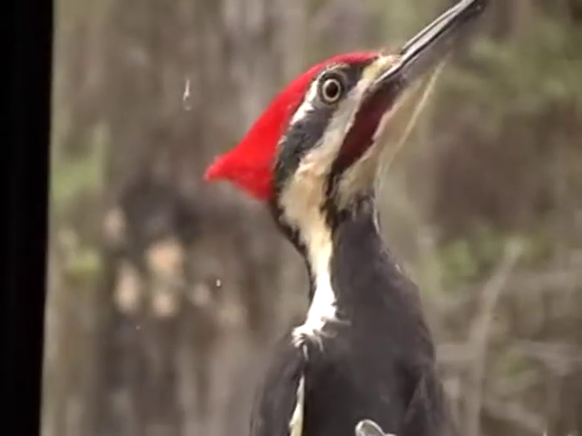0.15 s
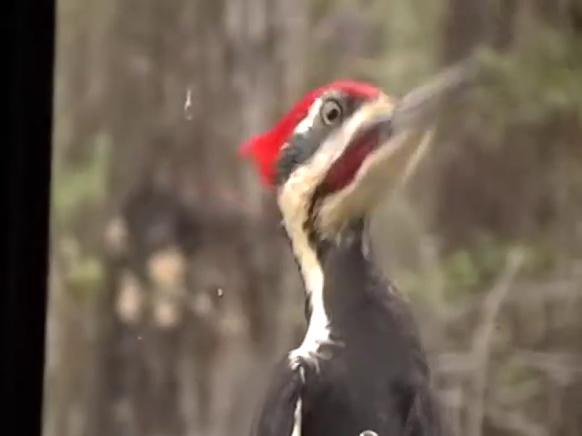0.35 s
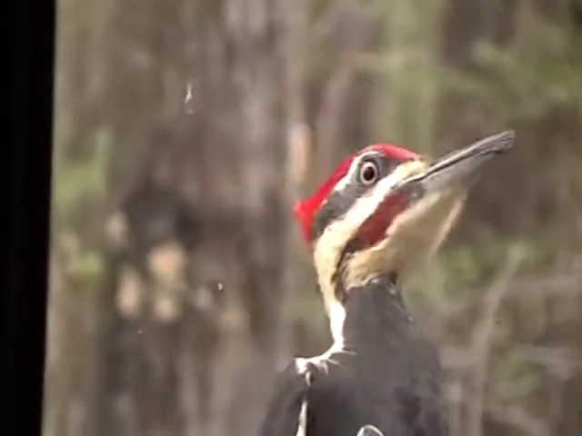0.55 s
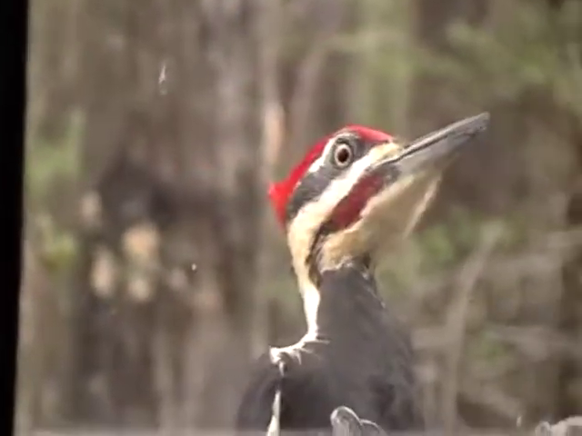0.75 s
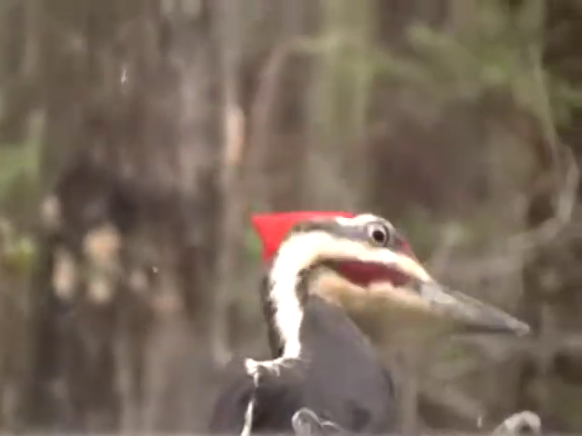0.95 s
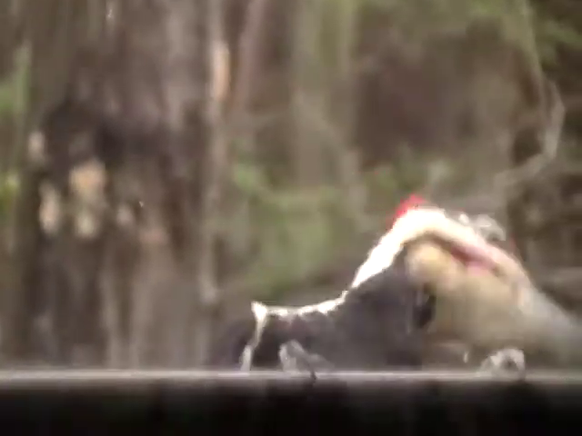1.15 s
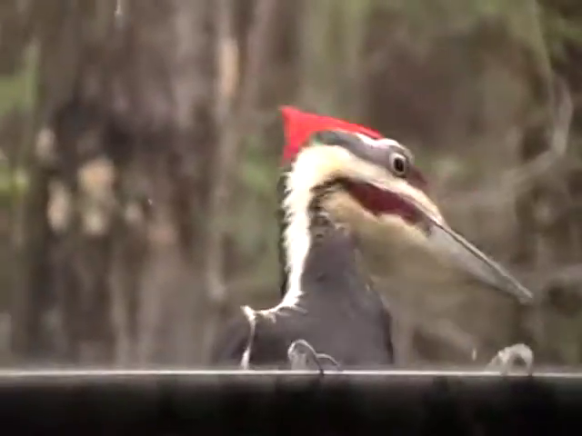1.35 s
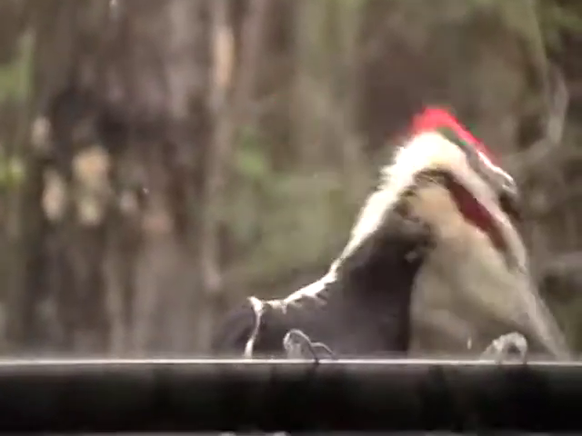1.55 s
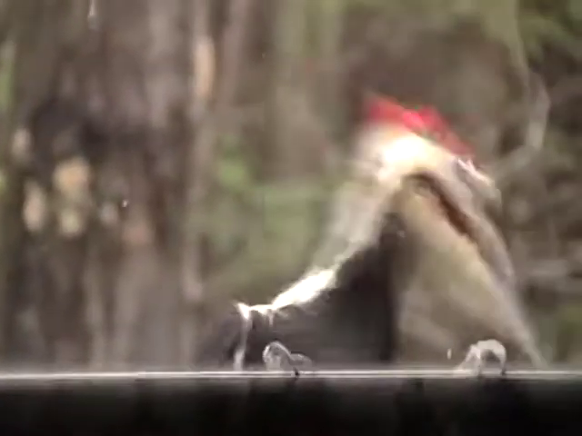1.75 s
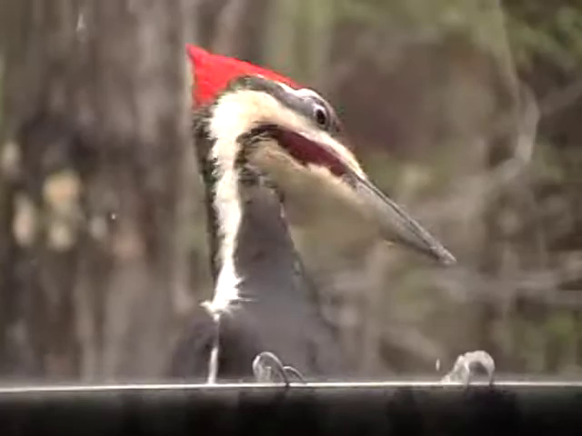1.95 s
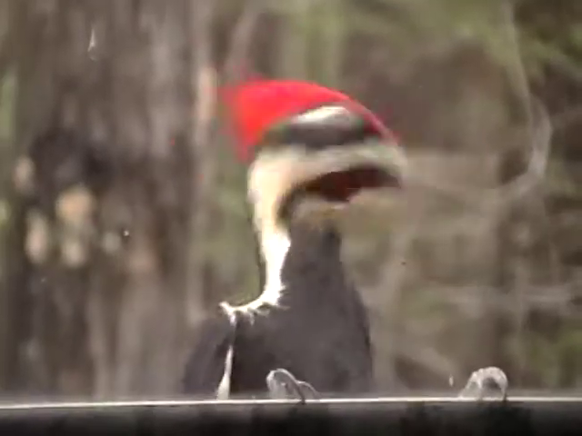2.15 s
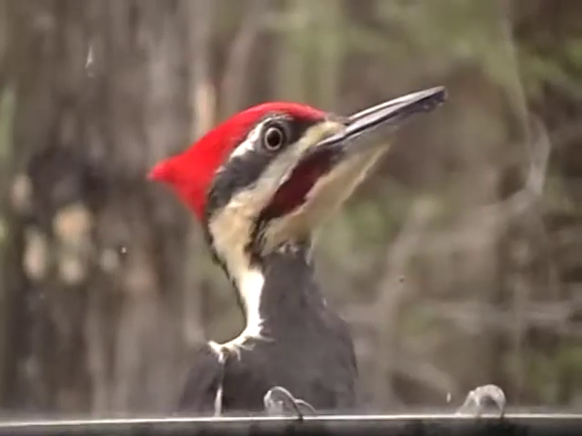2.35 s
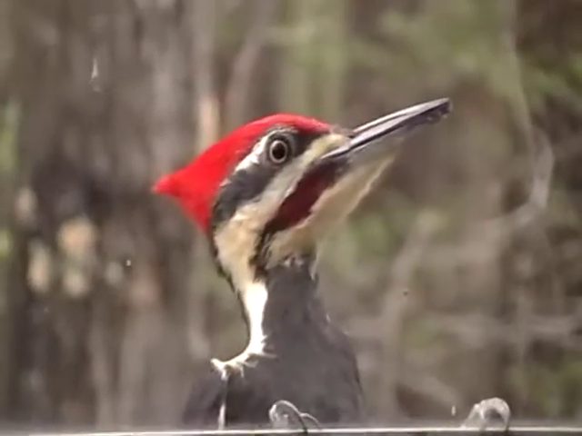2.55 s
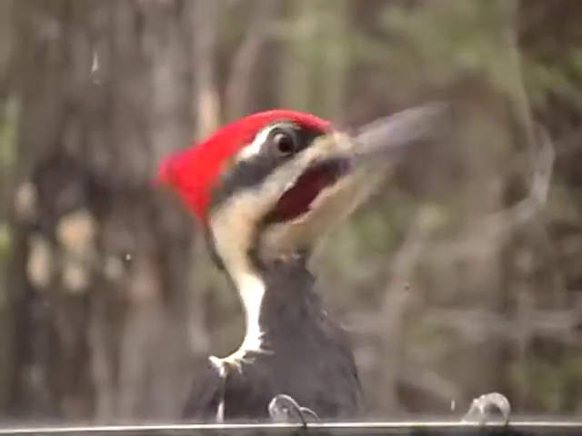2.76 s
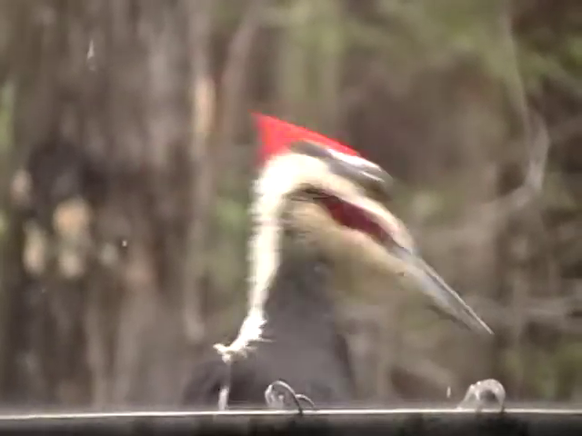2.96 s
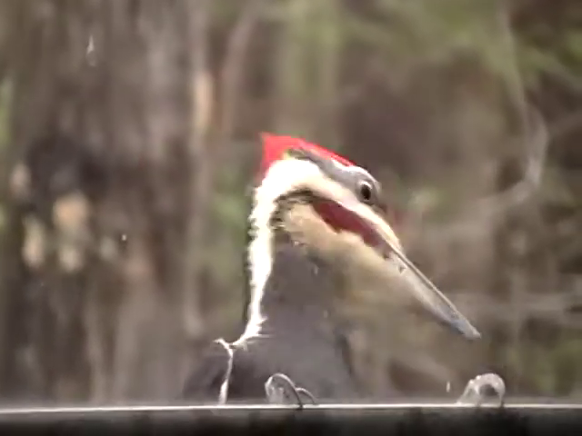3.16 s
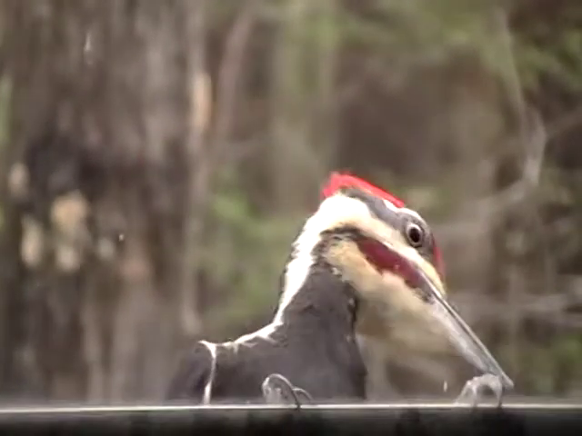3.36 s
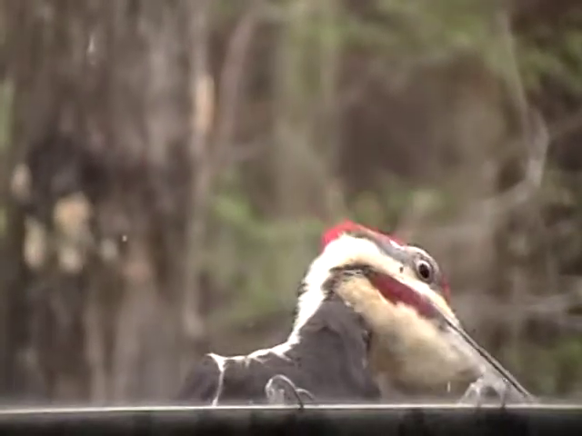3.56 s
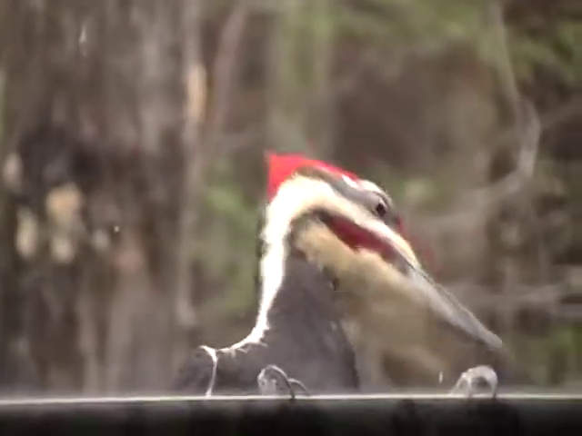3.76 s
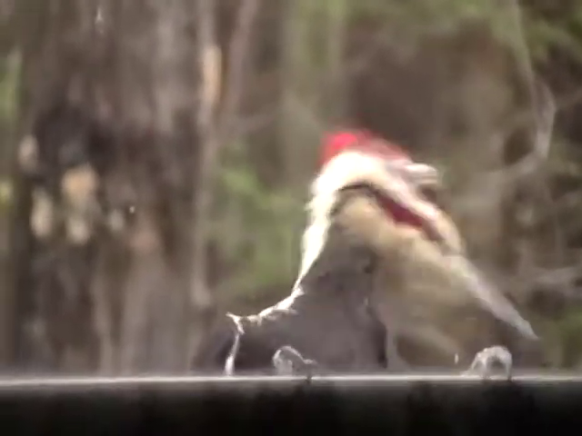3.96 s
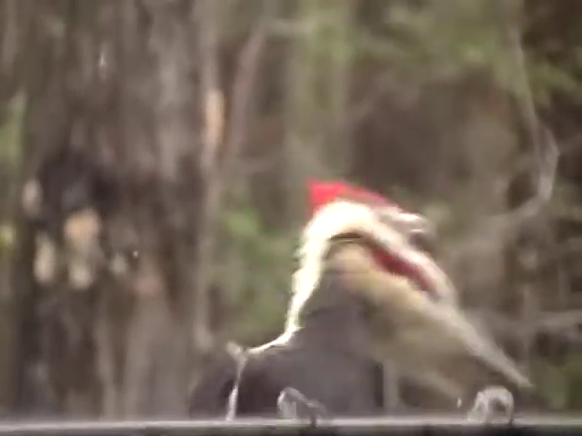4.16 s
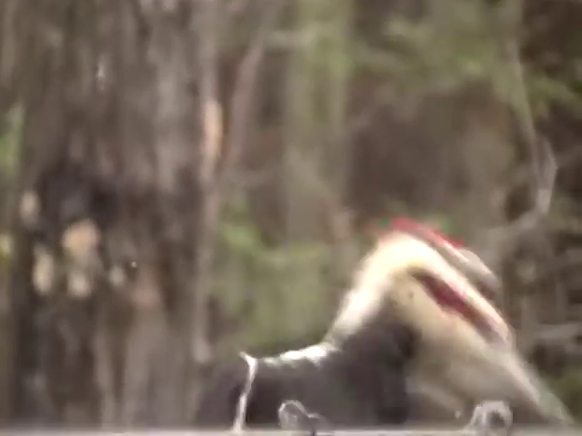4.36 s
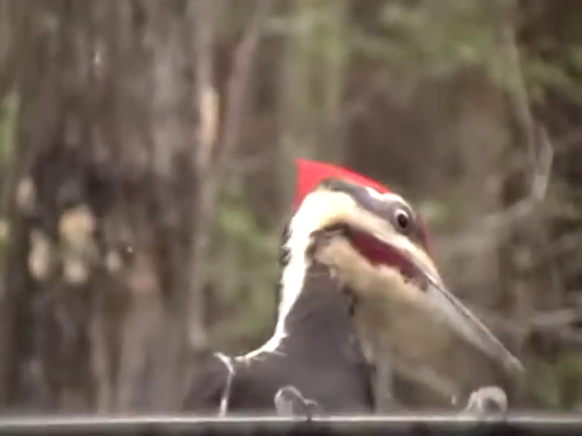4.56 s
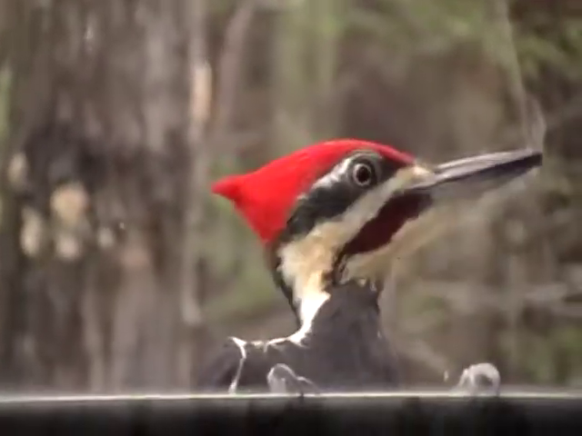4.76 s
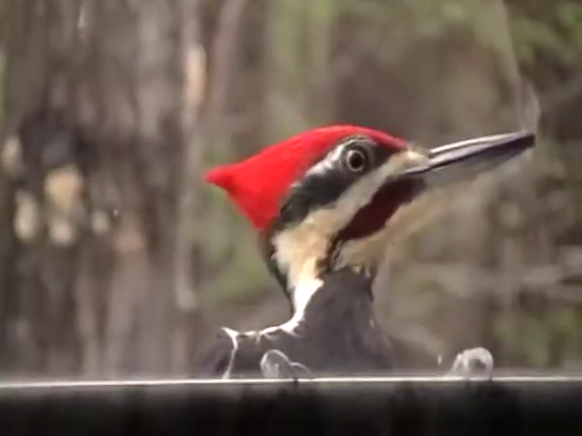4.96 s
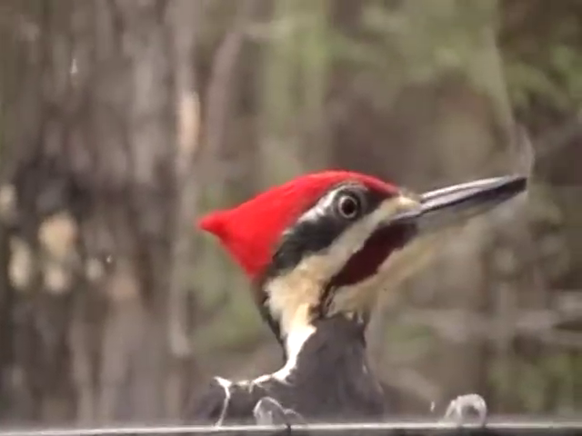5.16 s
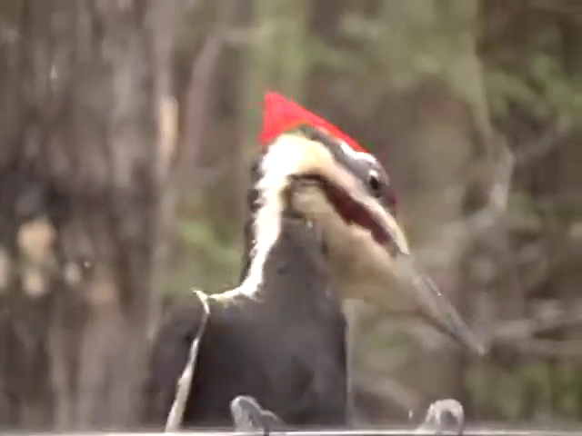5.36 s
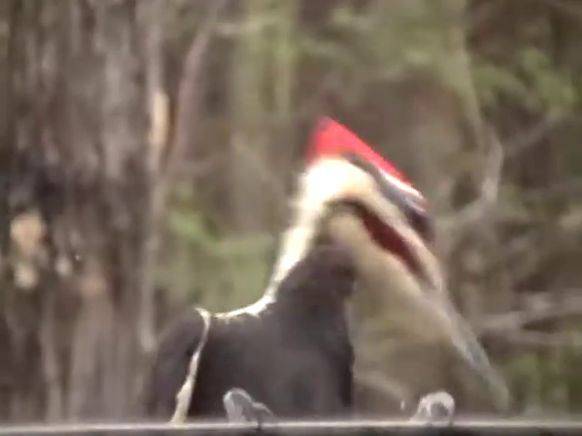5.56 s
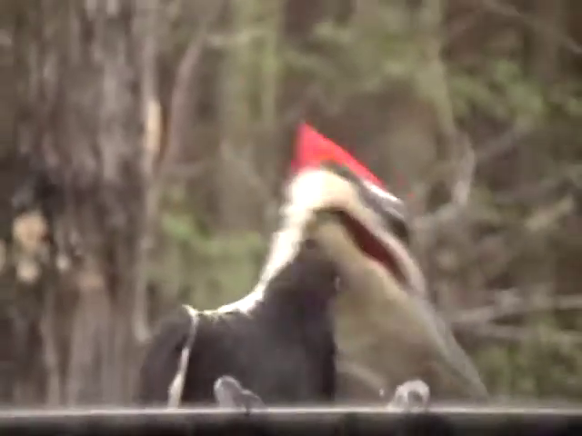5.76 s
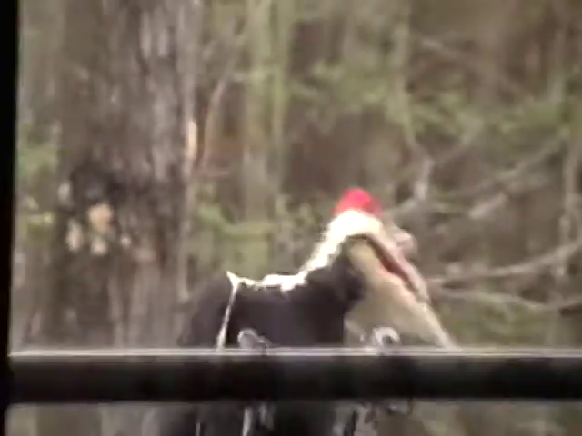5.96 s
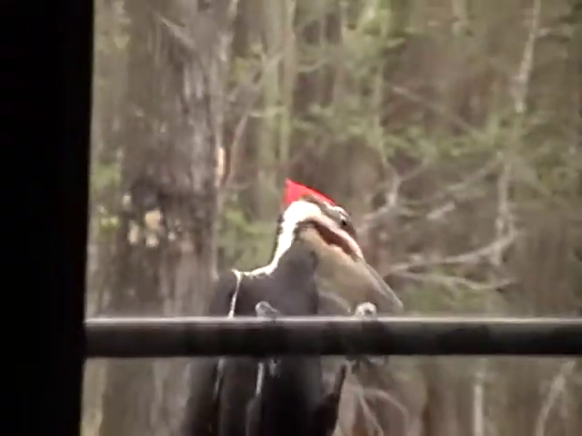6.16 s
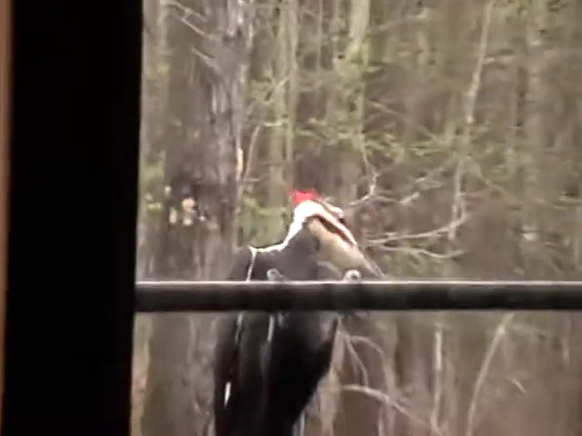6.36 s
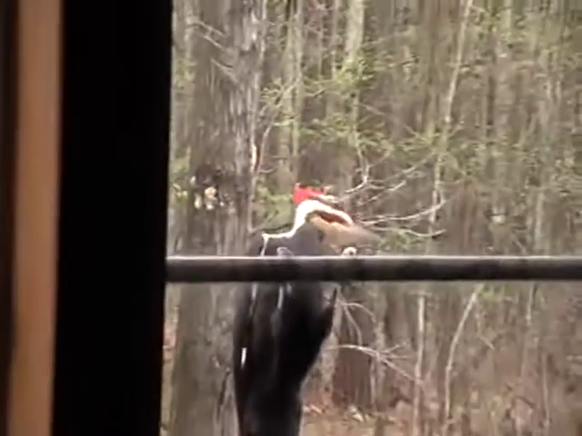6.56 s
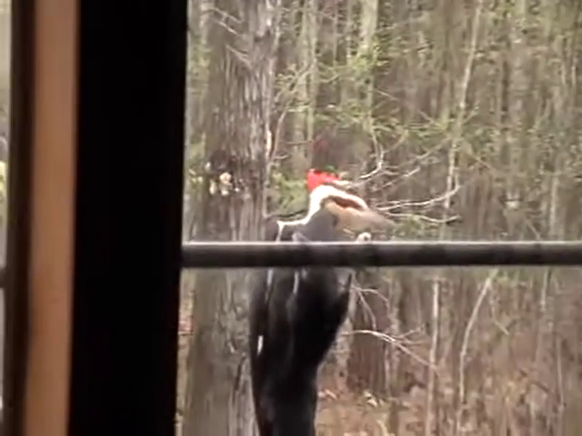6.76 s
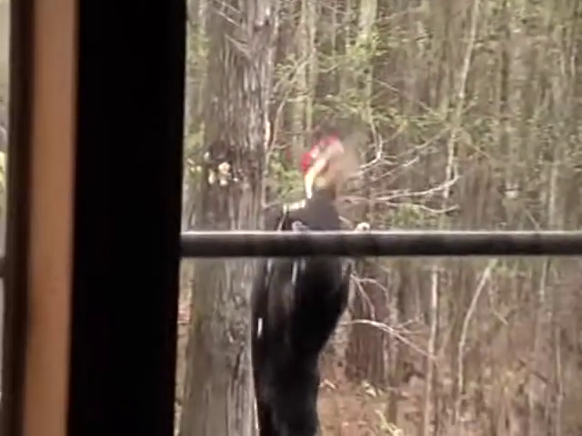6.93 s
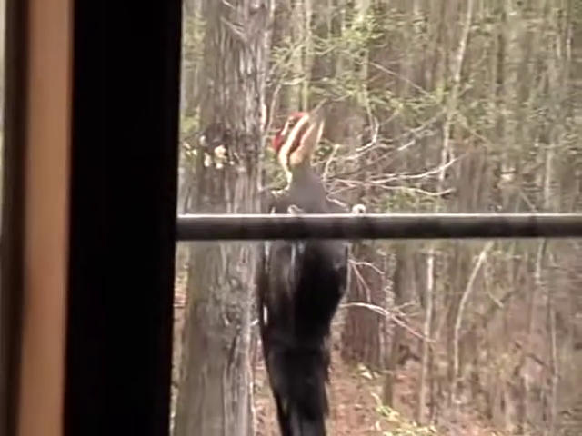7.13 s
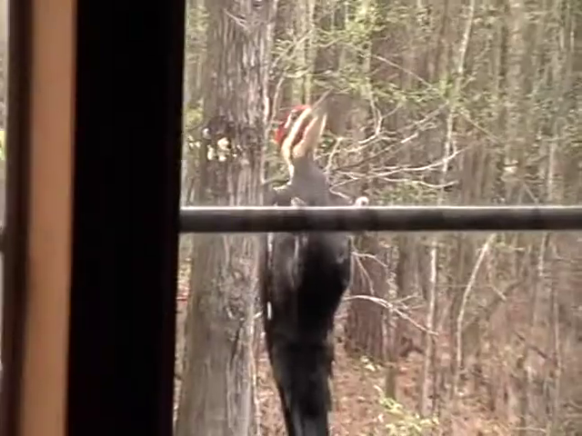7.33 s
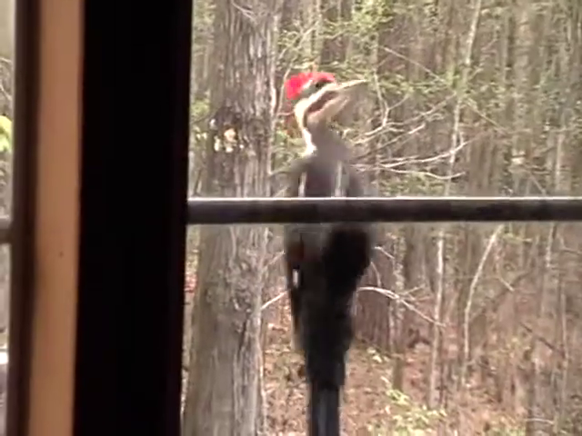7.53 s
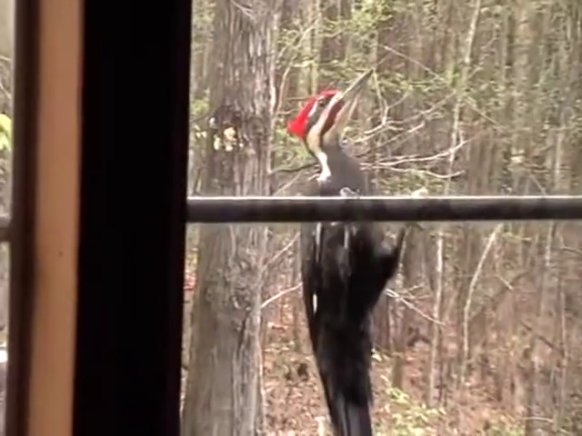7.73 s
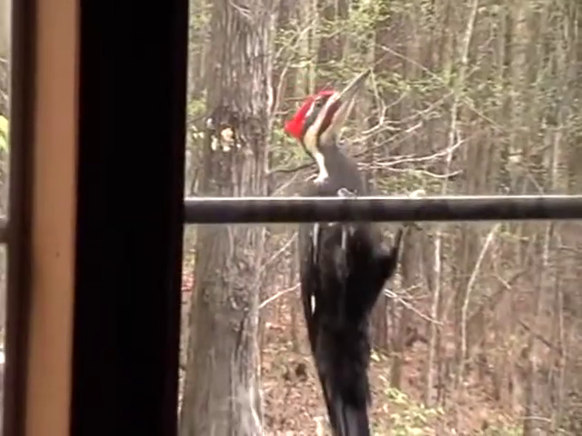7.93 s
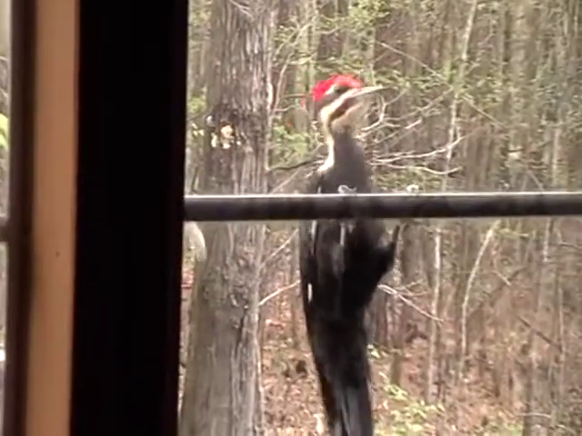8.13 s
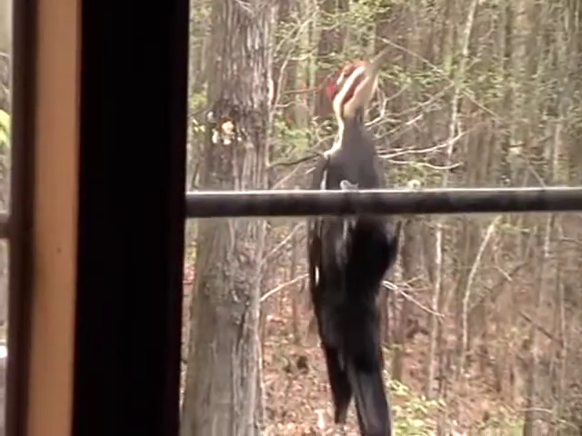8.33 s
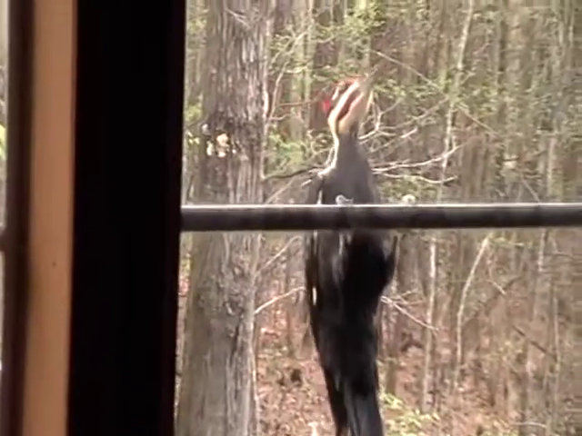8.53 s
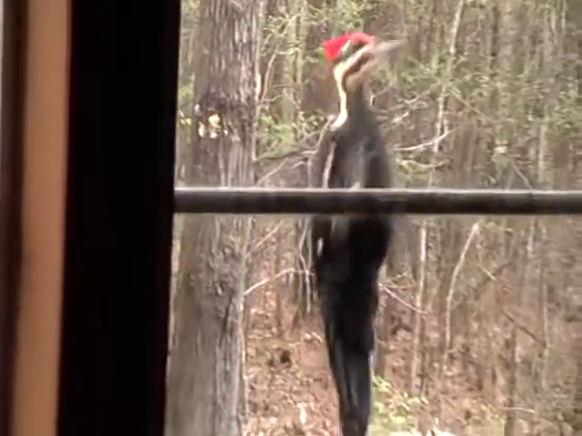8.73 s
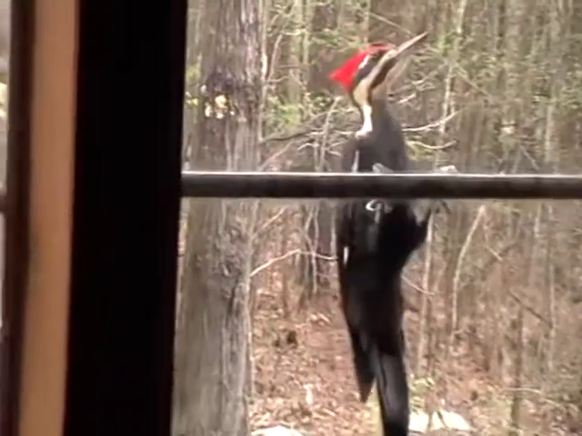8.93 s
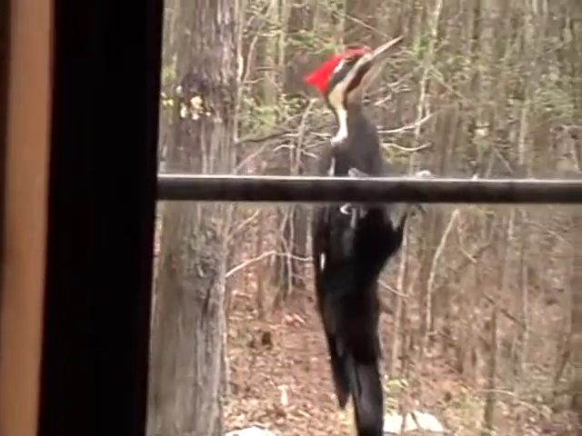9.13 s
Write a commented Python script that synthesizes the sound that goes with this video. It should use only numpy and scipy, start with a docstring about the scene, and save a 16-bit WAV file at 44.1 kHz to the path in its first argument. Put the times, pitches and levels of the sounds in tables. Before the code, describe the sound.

Heard from indoors, sharp woodpecker blows crack and boom against a window in short groups, followed by quiet ticks and two scrabbling hops.

```python
"""Woodpecker at the window

A large woodpecker clings to a bar outside a window and strikes at it in short runs of blows, heard from indoors.
Each blow is noise shaped into a crack and a fading room tail, plus fading sine waves for the booming pane.
Lighter knocks of the same kind are light touches of beak and claws, rebounds and dull bumps; it hops twice
along the bar. Faint squeaks are narrow bands of noise; the room is a soft steady rush of noise with a low
hum that fades."""
import sys
import numpy as np
from scipy import signal
from scipy.fft import rfft, irfft, next_fast_len
from scipy.io import wavfile
from scipy.ndimage import uniform_filter1d

SR = 44100
rng = np.random.default_rng(int(sys.argv[2]) if len(sys.argv) > 2 else 0)


def int16_out(signal):
    """Quantize to a 16-bit WAV file."""
    q = np.round(np.clip(np.atleast_2d(signal).T, -1, 1) * 32767)
    wavfile.write(sys.argv[1], SR, q.astype(np.int16))


N = 409688  # length of the scene in samples
RING = int(.7 * SR)  # length of one contact in samples
THUD_HZ = 420  # below this, the weight behind a light contact tells

# How wide the contacts and squeaks sound: pitch_hz [Hz], side_against_mid_db [dB]
CONTACT_WIDTH = [(60, -27.5), (250, -15), (600, -9.5), (1300, -11), (3000, -10), (6000, -11.5),
                 (14000, -11)]


def amp(db):
    """Turns decibels into a gain."""
    return 10 ** (np.asarray(db) / 20)


def rms(x):
    """Root mean square: the average strength of a sound."""
    return np.sqrt(np.mean(x ** 2) + 1e-20)


def read(points, hz):
    """Reads a curve whose points are joined by straight lines over log frequency."""
    f, value = np.transpose(points)
    return np.interp(np.log(hz + 1), np.log(f + 1), value)


def colour(x, points):
    """Filters x by a spectrum in dB."""
    size = next_fast_len(x.shape[-1] + 2048)
    gain = amp(read(points, np.fft.rfftfreq(size, 1 / SR)))
    return irfft(rfft(x, size) * gain, size)[..., :x.shape[-1]]


def add(mix, s, sound):
    """Adds a stereo sound to the mix at time s, cut off at the end of the scene."""
    part = mix[:, max(0, round(s * SR)):][:, :sound.shape[1]]
    part += sound[:, :part.shape[1]]


def stereo_noise(size, width):
    """White noise at two close microphones, more or less alike at each pitch as width tells."""
    mid, side = rng.standard_normal((2, size))
    side = colour(side, width)
    return np.array([mid + side, mid - side])


def room_air(hum_hz=88, air_db=-53, hum_db=-59.5, hum_fade_db_per_s=2.4):
    """A soft steady rush, coloured by the room's low resonances, and a faint hum that fades."""
    # Broad colour of the rush: pitch_hz [Hz], level_db [dB per Hz]
    rush = [(20, -17), (33, -30), (52, -7.5), (90, 2), (140, -7), (420, -6), (500, -13.5), (650, -6),
            (1150, -9.5), (1500, -8.5), (3500, -18.5), (5300, -23.5), (8000, -31.5), (15500, -41)]
    # Room resonances that stand out of it: pitch_hz [Hz], width_hz [Hz], height_db [dB]
    resonances = [(179, 31, 13), (237, 9.6, 12), (283, 56, 11), (356, 6.7, 12), (400, 16, 11)]
    # How wide the rush sounds: pitch_hz [Hz], side_against_mid_db [dB]
    air_width = [(60, -10), (110, -8.5), (200, -10), (380, -8.5), (700, -2), (1290, -5), (2380, -3.5),
                 (4400, -4), (8120, -3.5), (15000, -0.5)]
    hz = np.fft.rfftfreq(N, 1 / SR)
    t = np.arange(N) / SR
    level_db = read(rush, hz)
    for pitch_hz, width_hz, height_db in resonances:
        level_db = level_db + height_db / (1 + (2 * (hz - pitch_hz) / width_hz) ** 2)
    air = irfft(rfft(stereo_noise(N, air_width)) * amp(level_db), N)
    hum = amp(hum_db - hum_fade_db_per_s * t) * np.sqrt(2) * np.sin(2 * np.pi * hum_hz * t)
    return amp(air_db) * air / rms(air.mean(0)) + hum


def ripple(x, depth_db, step_hz=110):
    """Uneven strengths of closely spaced modes: random hills and hollows that flatten out in the treble."""
    hz = 900 + step_hz * np.arange(200)
    db = depth_db * rng.standard_normal(len(hz)) / np.sqrt(1 + (hz / 6000) ** 4)
    return colour(x, [(0, 0), (800, 0)] + list(zip(hz, db)))


def fade_in_room(x):
    """Lets every frequency die at the room's own speed."""
    # The room's dying: pitch_hz [Hz], time to fall by 60 dB fade_s [s]
    room_fade = [(80, 1), (250, 0.5), (600, 0.42), (1500, .37), (4000, 0.39), (6500, 0.37), (10000, 0.33),
                 (15000, .2)]
    hz, t, z = signal.stft(x, SR, nperseg=256)
    fade = 1e-3 ** (t / read(room_fade, hz)[:, None])
    return signal.istft(z * fade, SR, nperseg=256)[1][:, :x.shape[1]]


def pane(rise_s=0.0032, vary_db=3.5, apart=.11, return_s=0.039, return_share=0.61, return_fade_s=0.03):
    """The modes swell as the blow spreads over the glass; each strike point weighs them differently."""
    # Modes of pane, bar and room: pitch_hz [Hz], typical level_db [dB], time to fall by 60 dB fade_s [s]
    pane_modes = [(63, -20, .7), (96, -1, .22), (119, -13, .5), (135, -16, .6), (175, -4, .24),
                  (193, -1, .27), (208, -7, .24), (259, 2, .35), (276, -8, .26), (296, -4, .34),
                  (314, -4, .3), (352, -5, .28), (381, -2, .55), (433, -5, .5), (453, -12, .3),
                  (571, -10, .28), (589, -10, .28), (620, -7, .3), (650, -11, .3), (705, -6, .22),
                  (744, -3, .28), (779, -8, .28), (880, -4, .3), (899, -6, .3), (1156, -11, .33),
                  (1239, -12, .3), (1405, -15, .32), (1868, -13, .38), (2182, -13, .34), (2437, -13, .34)]
    t = np.arange(RING) / SR
    hz, db, t60 = np.transpose(pane_modes)[:, :, None]
    weight, lag, side = rng.standard_normal((3, len(pane_modes), 1))
    sign = (-1) ** np.arange(len(pane_modes))[:, None]
    phase = 2 * np.pi * hz * t + lag * hz / 500  # short waves depend most on the strike point
    fade = np.exp(-np.log(1000) * t / t60)
    modes = sign * amp(db + vary_db * weight) * fade * np.sin(phase)
    lean = apart * side * np.sqrt(hz / 1000)  # short waves also differ most between the microphones
    both = np.array([(modes * (1 + lean)).sum(0), (modes * (1 - lean)).sum(0)])
    # the far wall sends the boom back and holds it up a moment longer
    late = np.maximum(t - return_s, 0)
    held = (1 - np.exp(-late / rise_s)) * np.exp(-(late / return_fade_s) ** 2)
    swell = 1 - np.exp(-t / rise_s) + return_share * held
    return both * swell


def blow(path, crack_fade_s, direct_db, tick_db, pane_db, alike):
    """One contact: the tick of the hard tip, a bright crack, its tail in the room and the boom of the pane."""
    # Dense upper modes of frame and glass: pitch_hz [Hz], level_db [dB per Hz]
    frame_modes = [(38, -44.5), (90, -8.5), (300, 2.5), (440, -3), (500, -11.5), (570, -1), (800, 1.5),
                   (1080, -5), (1450, 2), (2300, -2.5), (3600, -11), (5800, -10.5), (9500, -21.5),
                   (15800, -28.5)]
    uneven_db = 2.7  # how unevenly one strike point excites the upper modes
    t = np.arange(RING) / SR
    # part of the noise is shared by all contacts, the rest is new each time
    alike = np.clip(alike, 0, 1)
    ring = alike * path + np.sqrt(1 - alike ** 2) * stereo_noise(RING, CONTACT_WIDTH)
    ring = colour(ripple(ring, uneven_db), frame_modes)
    ring /= rms(ring)

    crack = colour(ring, [(200, -2.5), (700, -15.5), (2000, -11.5), (5500, -3), (9000, 1), (13000, -5.5)])
    crack *= amp(direct_db) * np.exp(-t / crack_fade_s)

    tick = stereo_noise(RING, CONTACT_WIDTH)
    tick = colour(tick, [(500, -33), (3000, -20), (8000, -8.5), (12000, 5.5), (16000, -7)])
    tick *= amp(tick_db) * np.exp(-t / 0.0022)

    attack = 1 - np.exp(-t / 0.0014)
    return (crack + tick + fade_in_room(ring)) * attack + amp(pane_db) * pane()


def contact_colour(tip, force_db, give_s, weight_db, weight_hz, bite_db=0, order=1):
    """The longer a contact gives, the less treble it excites; weight adds bass, a sharp tip the very top."""
    tip_hz = 9500  # above this, the bite of the beak's tip tells
    hz = np.geomspace(40, 16000, 80)
    treble_db = -10 * order * np.log10(1 + (hz * give_s) ** 2)
    bass_db = weight_db / (1 + (hz / weight_hz) ** 4)
    top_db = bite_db / (1 + (tip_hz / hz) ** 4)
    return list(zip(hz, read(tip, hz) + force_db + treble_db + bass_db + top_db))


def touch(path, slide_s, level_db=-18.0, short_s=0.0044, grain_db=4):
    """A light knock on the bar; the shorter it slides, the more its click stands out of the tail."""
    t = np.arange(RING) / SR
    sharp_db = 10 * np.log10(short_s / slide_s)
    hit = blow(path, crack_fade_s=slide_s, direct_db=10 + sharp_db, tick_db=9.5 + 1.8 * sharp_db,
               pane_db=-7, alike=0.34)
    # the contact catches and slips while it lasts
    slips = uniform_filter1d(rng.standard_normal(RING), size=110)
    hit *= amp(grain_db * slips / rms(slips) * np.exp(-t / (2 * slide_s)))
    return hit * amp(level_db) / rms(hit[:, :int(.02 * SR)])  # levelled by its first 20 ms


def light_contact(path, force_db, give_s, slide_s, thud_db):
    """A light contact of beak or claw: a thin tick when it hits hard, a scrape when it gives."""
    # Colour of a perfectly hard light contact: pitch_hz [Hz], level_db [dB]
    hard_touch = [(40, -34), (90, -17), (260, -13), (720, -16), (2000, -12.5), (5300, -.5), (11500, 3)]
    return colour(touch(path, slide_s), contact_colour(hard_touch, force_db, give_s, thud_db, THUD_HZ, order=2))


def bump(path, force_db, slide_s, thud_db=0):
    """A soft contact that brings out the bar's hollow knock."""
    # Colour of a dull bump on the bar: pitch_hz [Hz], level_db [dB]
    dull_bump = [(40, -32), (90, -18), (260, -19), (500, -13), (750, -8), (1200, -16), (2000, -22.5),
                 (5300, -25), (11500, -27)]
    return colour(touch(path, slide_s), contact_colour(dull_bump, force_db, 0, thud_db, THUD_HZ))


def light_touches(path):
    """Single ticks, scrapes and dull bumps: light touches of beak and claws, a soft first knock, rebounds."""
    # Light contacts of beak and claws, ticks, scrapes and soft rebounds:
    # start_s [s], force_db [dB], give_s (softness of the contact) [s], slide_s [s], thud_db [dB]
    light_contacts = [(0.001, -9, .00025, .036, 5), (0.867, -26, .0003, .012, -6),
                      (0.894, -17, .00025, .011, 2), (4.3552, 9.5, .0005, .0019, -14),
                      (4.412, 6, .0005, .008, 0), (5.3445, -19, .00002, .0044, 2),
                      (6.418, -27, .00016, .01, 0), (6.465, -25, .00025, .01, 2),
                      (7.003, -16.5, .00001, .01, 0), (7.578, -1, .00017, .015, -15),
                      (8.0827, -23, .00016, .015, 0), (8.098, -12, .00035, .02, 2),
                      (8.222, -16, .00005, .0047, 5), (8.633, -28, .00011, .008, -6),
                      (9.0735, -19.5, .0001, .006, -12), (9.086, -24, .00008, .005, -3)]
    # Dull bumps, a soft first knock and a rebound after a blow:
    # start_s [s], force_db [dB], slide_s [s], thud_db [dB]
    dull_bumps = [(1.1735, -.5, .01, 13), (4.186, -8, .01, 11)]
    out = np.zeros((2, N))
    for start_s, *contact in light_contacts:
        add(out, start_s, light_contact(path, *contact))
    for start_s, *contact in dull_bumps:
        add(out, start_s, bump(path, *contact))
    return out


def pecks(path, level_db=-22.5):
    """Heavy blows of the beak: a square hit is bright, a glancing one dull."""
    # Blows: start_s [s], force_db [dB], give_s (softness of the contact) [s],
    # boom_db (extra bass) [dB], bite_db (extra top of the sharp tip) [dB]
    beak_blows = [(1.5604, -2.3, .0008, 0, 0), (1.7867, 1.5, .0004, 1.5, -1.5),
                  (2.0593, -2.5, .00024, 6, 2), (3.0402, -3.8, .00045, 8, 5.5), (3.248, -.8, .0002, 2, 8),
                  (3.908, -4, .00085, 7, 0), (4.132, -.7, .0004, 8, 11), (4.3643, .4, .00003, 2.5, 3.5),
                  (5.507, -2.8, .00027, 3, -8), (5.734, -1.3, .00036, -2.5, -3),
                  (5.98, 2, .00003, -4.5, -2.5)]
    # Colour of a perfectly hard blow of the beak: pitch_hz [Hz], level_db [dB]
    hard_beak = [(55, -7), (95, 1.7), (180, 3), (300, 1.7), (720, 1), (2000, 1), (5300, 7.5), (11500, 8)]
    boom_hz = 160  # below this, the weight behind the beak tells
    out = np.zeros((2, N))
    for start_s, force_db, give_s, boom_db, bite_db in beak_blows:
        hit = blow(path, crack_fade_s=0.01, direct_db=6.0, tick_db=5.5, pane_db=-5.0, alike=.65)
        hit *= amp(level_db) / rms(hit[:, :int(.12 * SR)])  # levelled by its first 120 ms, before its colour
        add(out, start_s, colour(hit, contact_colour(hard_beak, force_db, give_s, boom_db, boom_hz, bite_db)))
    return out


def chips():
    """Faint hoarse squeaks, narrow bands of noise that swell and fade, most as the bird winds up for a blow."""
    # Squeaks: start_s [s], pitch_hz [Hz], level_db (before the swell) [dB], length_s [s]
    squeaks = [(1.69, 2900, -52, .095), (1.945, 2550, -52, .085), (3.155, 5500, -53, .05),
               (3.15, 2600, -53, .065), (3.581, 5200, -53, .012), (4.25, 1980, -48, .065),
               (4.878, 5200, -55, .012), (5.905, 2080, -51, .08), (6.584, 5200, -60, .025)]
    out = np.zeros((2, N))
    for start_s, hz, level_db, length_s in squeaks:
        noise = stereo_noise(int(length_s * SR), CONTACT_WIDTH)
        band = [(hz / 2, -28), (hz * .8, -10), (hz * .95, 0), (hz * 1.05, 0), (hz * 1.2, -12), (hz * 2, -38)]
        squeak = colour(noise, band)
        swell = np.hanning(squeak.shape[1])
        add(out, start_s, amp(level_db) * squeak / rms(squeak) * swell)
    return out


def hops(path):
    """A dull push-off, one foot landing with the bird's weight, then the other, and the claws close."""
    # Hops along the bar: push_s [s], push_db [dB], first_foot_s [s], second_foot_s [s], landing_db [dB]
    bar_hops = [(7.503, -11, 7.5571, 7.587, 0), (8.736, -4, 8.7643, 8.789, 1.5)]
    # Claw contacts of a landing, each one row: force_db [dB], give_s [s], slide_s [s], thud_db [dB]
    first_foot = (6, .00028, .018, 0)
    second_foot = (4.5, .0002, .01, -10)
    closing = (-1.5, .00018, .007, -6)
    closing_delay_s = .041  # the claws close this long after the second foot lands
    push_slide_s = .018
    # the sole bumps the bar just before the claws catch
    sole_lead_s, sole_db, sole_slide_s = .008, -2, .008
    out = np.zeros((2, N))
    for push_s, push_db, first_s, second_s, landing_db in bar_hops:
        add(out, push_s, bump(path, push_db, push_slide_s))
        add(out, first_s - sole_lead_s, bump(path, landing_db + sole_db, sole_slide_s))
        stages = (first_s, first_foot), (second_s, second_foot), (second_s + closing_delay_s, closing)
        for start_s, contact in stages:
            add(out, start_s, amp(landing_db) * light_contact(path, *contact))
    return out


def scene():
    """All contacts reach the microphones by the same path through frame and room; the room's air is added."""
    # Balance of the bird's sounds: pitch_hz [Hz], left_against_right_db [dB]
    balance = [(80, -1.9), (300, -0.1), (700, -0.2), (1400, 1.9), (2800, 1), (5500, -0.7), (9000, 0.8),
               (12500, 3)]
    path = stereo_noise(RING, CONTACT_WIDTH)
    bird = light_touches(path) + pecks(path) + chips() + hops(path)
    left = colour(bird[0], [(hz, db / 2) for hz, db in balance])
    right = colour(bird[1], [(hz, -db / 2) for hz, db in balance])
    return np.array([left, right]) + room_air()


def record(dry):
    """The recorder's band limit: a steep filter takes away the highest treble."""
    edge_hz = 15950
    lowpass = signal.firwin(301, edge_hz, window=("kaiser", 9), fs=SR)
    return signal.oaconvolve(dry, lowpass[None], "same")


dry = scene()
out = record(dry)
int16_out(out)
```